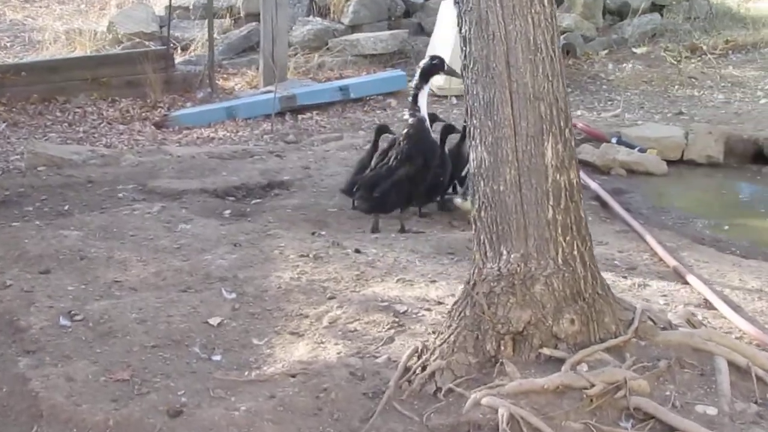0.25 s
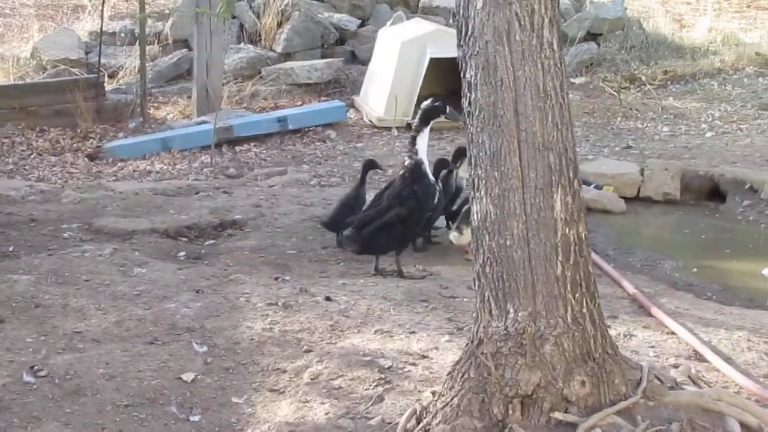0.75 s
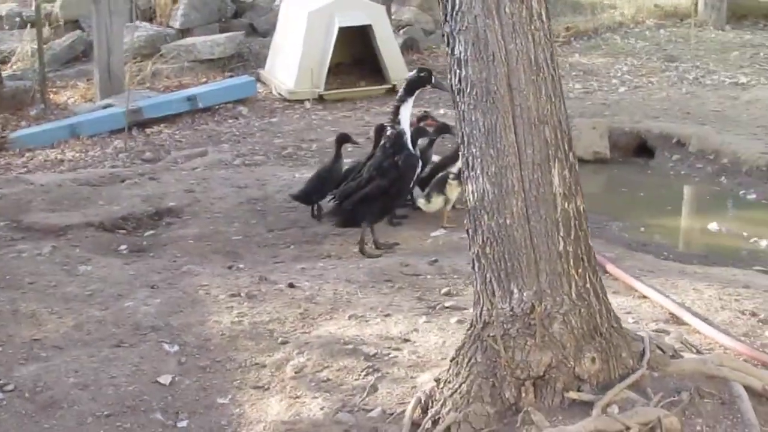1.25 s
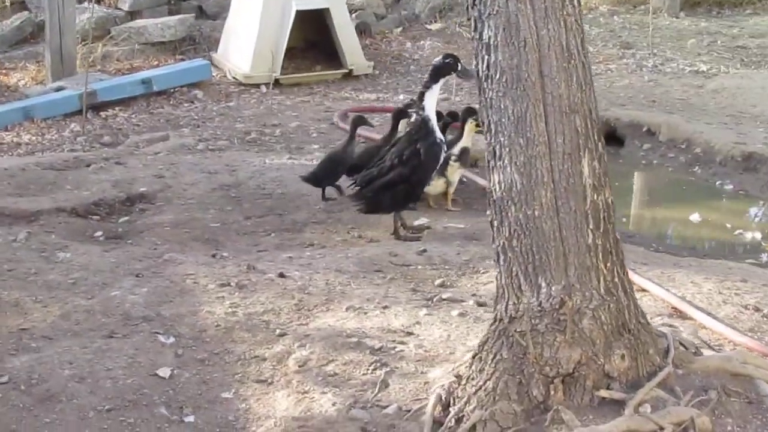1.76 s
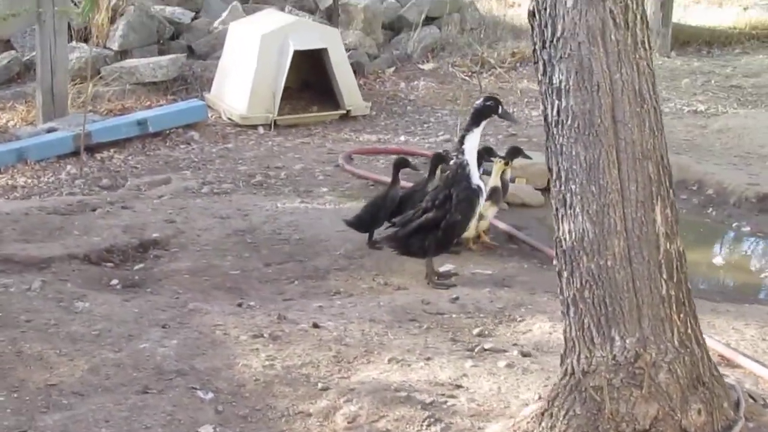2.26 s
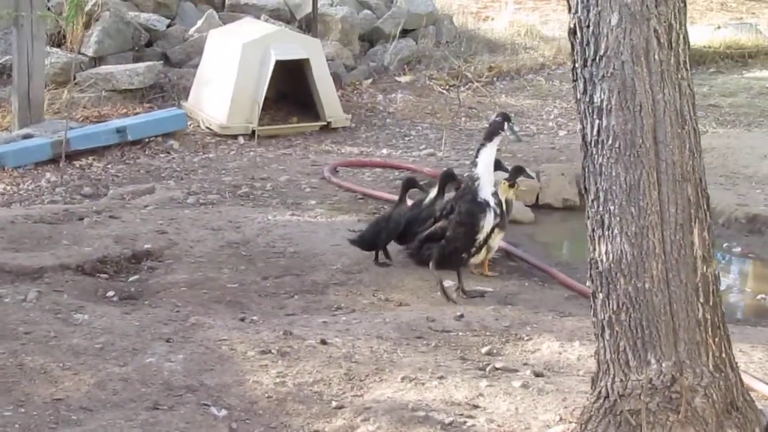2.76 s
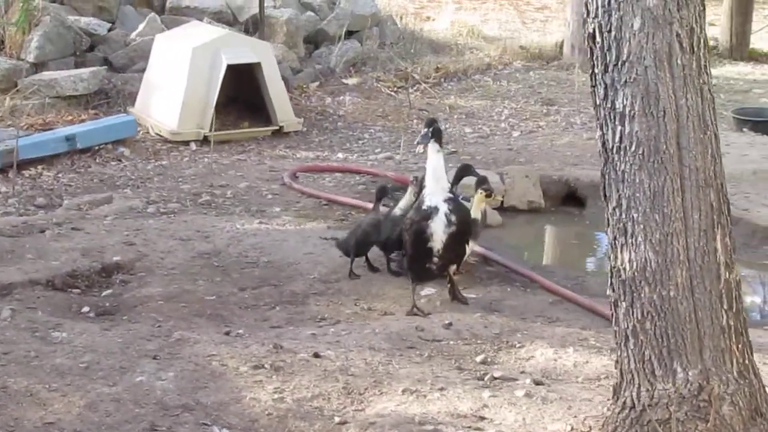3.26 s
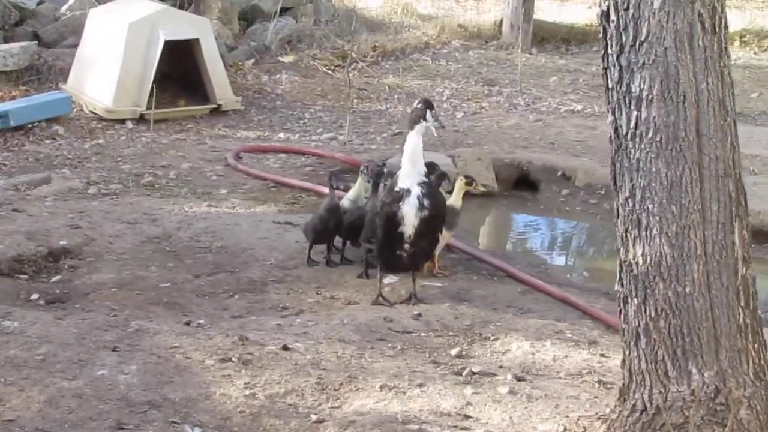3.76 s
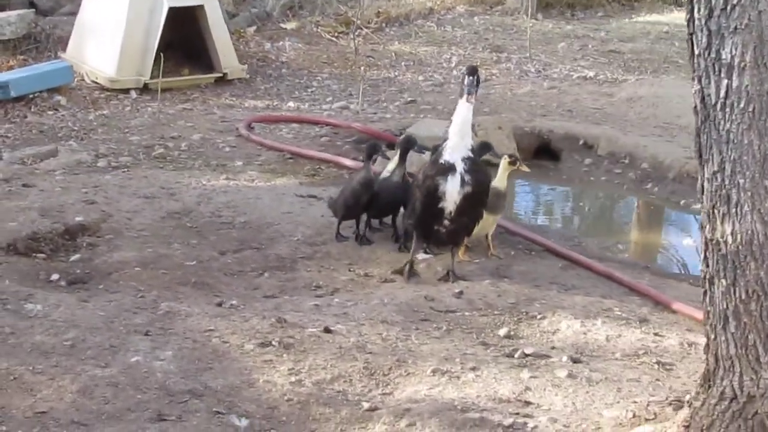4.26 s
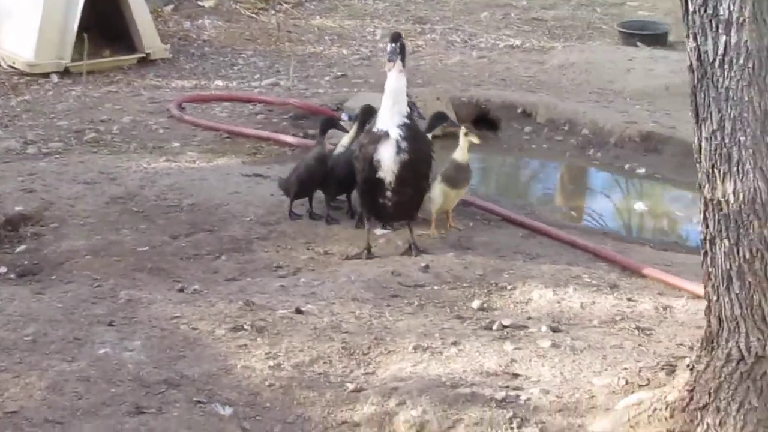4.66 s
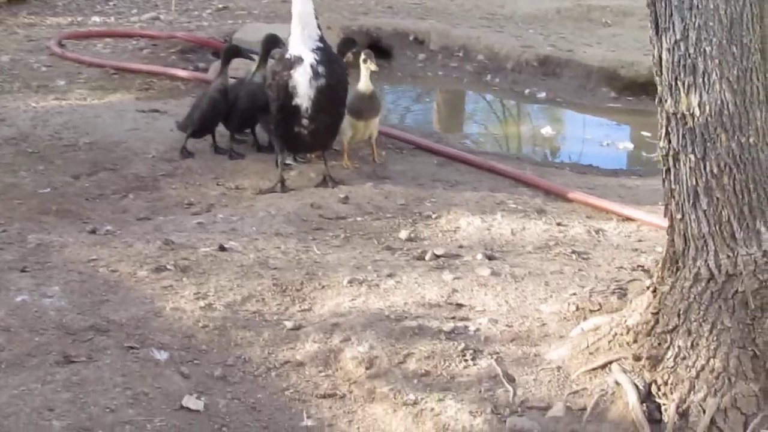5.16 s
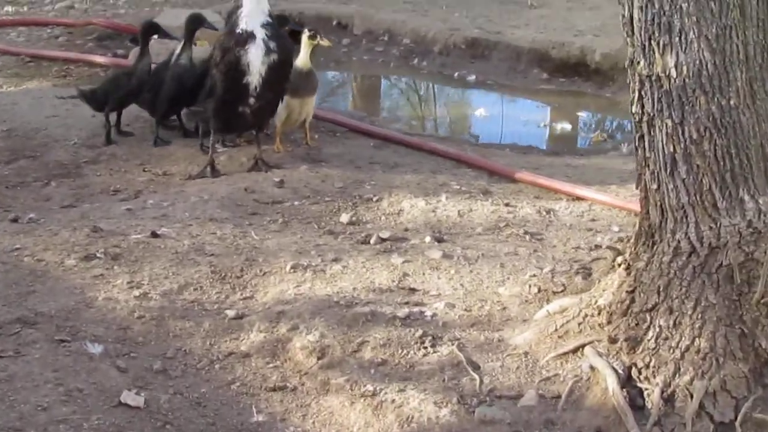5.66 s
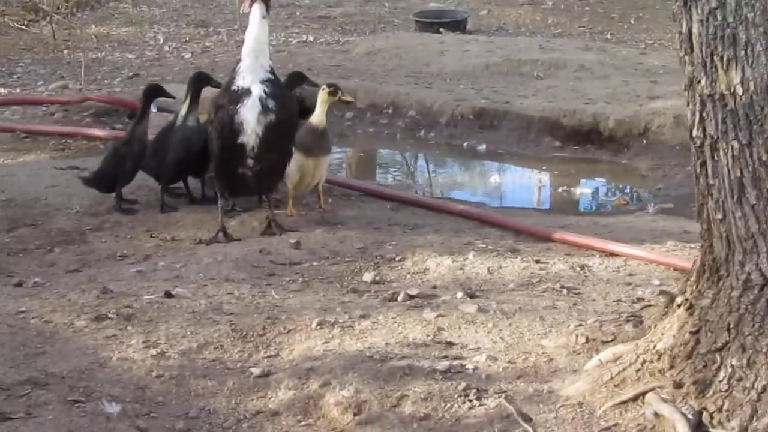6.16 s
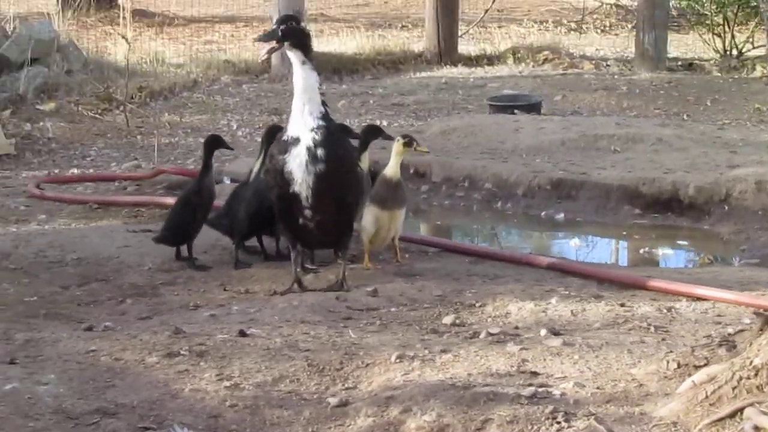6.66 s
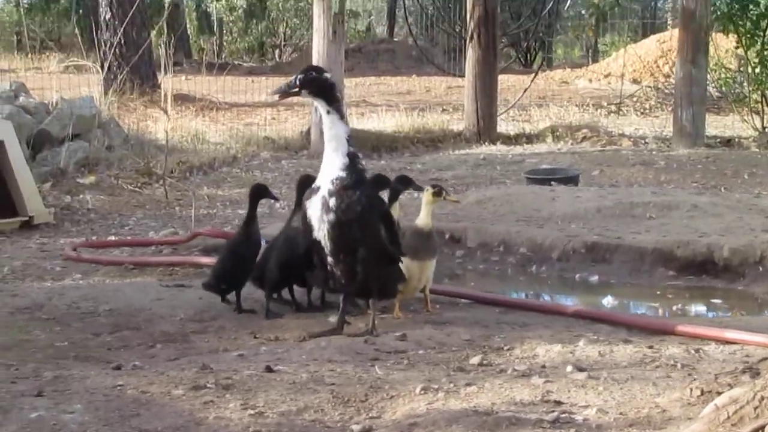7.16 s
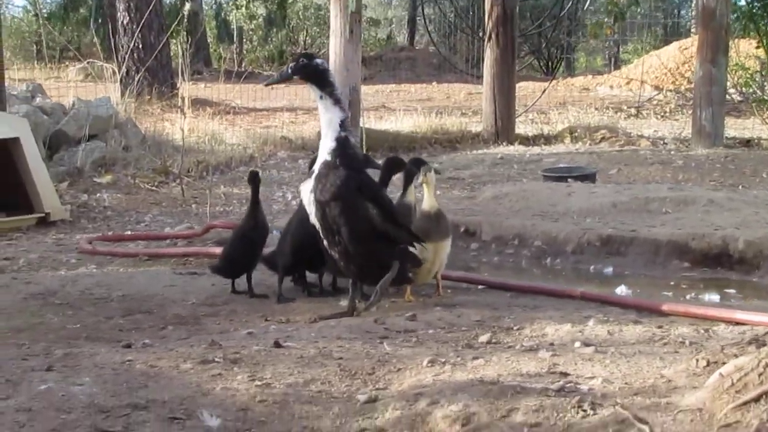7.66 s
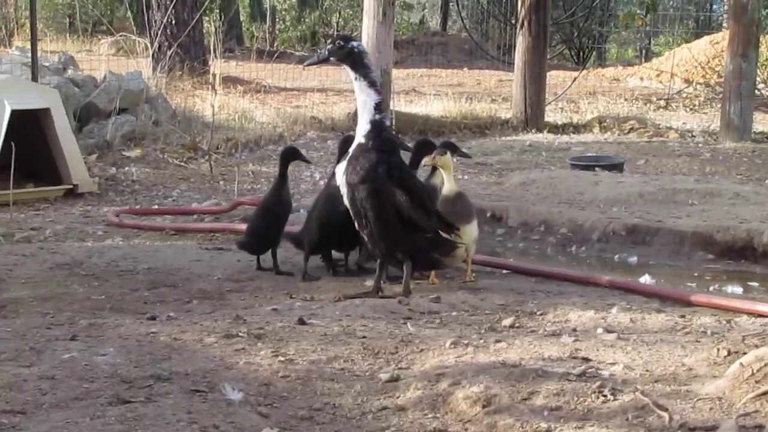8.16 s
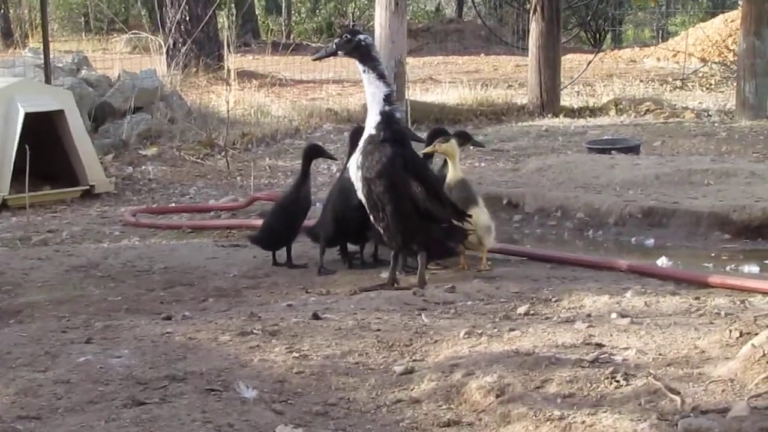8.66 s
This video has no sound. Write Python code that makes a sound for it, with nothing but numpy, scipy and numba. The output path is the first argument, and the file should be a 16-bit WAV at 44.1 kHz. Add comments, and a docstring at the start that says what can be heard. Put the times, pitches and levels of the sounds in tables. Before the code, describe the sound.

A handheld stereo microphone in an open yard picks up a duck family. Dense, piercing chirpy peeps come first over soft throaty clucking, then a rasping quack. The clucks become louder and more frequent through the middle, with two more sharp quacks, gritty footsteps and slight low microphone buffeting. The end is calmer, with sparse drawn-out peeps, quiet muttering, faint low drone and airy hiss.

```python
"""A mother duck leads her ducklings across a farmyard, a few metres away, over rumble and hiss. From the start
other ducks mutter softly, she clucks in rattling pulses, and the ducklings peep, each with two whistles; a
distant engine soon fades, and feet scuff the dry dirt, a swell of tiny clicks. Thin whines slip in, then three
loud quacks through an open bill, near 1.5, 4.4 and 6.6 s. A low drone joins from 4.4 s; the yard answers every
call with a faint echo of filtered, decaying noise."""
import sys
import numpy as np
from scipy import signal
from scipy.fft import rfft, irfft
from scipy.io import wavfile
from scipy.ndimage import uniform_filter1d
from numba import njit

SR = 44100
rng = np.random.default_rng(int(sys.argv[2]) if len(sys.argv) > 2 else 0)


def log_audio(samples):
    """Write samples as a 16-bit WAV file to the path given in sys.argv[1]."""
    # one column per channel
    frames = np.atleast_2d(samples).T
    # limit to full scale, then quantise
    limited = np.clip(frames, -1, 1)
    pcm = np.round(limited * 32767).astype(np.int16)
    wavfile.write(sys.argv[1], SR, pcm)


N = 393372
T = np.arange(N) / SR
TOP_HZ = 15800  # upper edge of the whole sound


def undb(db):
    """Decibels to gain."""
    return 10 ** (np.asarray(db) / 20)


def curves(rows):
    """The columns of a table, joined by straight lines in time."""
    s, *columns = np.transpose(rows)
    return [np.interp(T, s, column) for column in columns]


def ramp(t, start, length):
    """From 0 to 1 over the given stretch of time."""
    return np.clip((t - start) / length, 0, 1)


def unit(x):
    """Scale to rms 1."""
    return x / np.sqrt(np.mean(x ** 2) + 1e-18)


def walk(rate, size):
    """Smooth random drift with a spread near 1, given the rate of its steps per second."""
    step = int(SR / rate)
    levels = np.repeat(rng.standard_normal(size // step + 1), step)
    return 1.335 * uniform_filter1d(levels, step)[:size]


def sine(hz):
    """A sine that follows a moving pitch."""
    return np.sin(2 * np.pi * np.cumsum(hz) / SR)


def colour(x, points, size=1024):
    """Minimum-phase filter with the given (Hz, dB) response, built by folding its cepstrum."""
    hz, db = np.transpose(points)
    grid = np.maximum(np.arange(size // 2 + 1) * SR / size, 1)
    response_db = np.interp(np.log(grid), np.log(hz), db)
    cepstrum = irfft(np.log(undb(response_db)))
    cepstrum[1:size // 2] *= 2
    cepstrum[size // 2 + 1:] = 0
    impulse = irfft(np.exp(rfft(cepstrum)))
    return signal.fftconvolve(x, impulse)[:len(x)]


@njit
def svf(x, hz, width):
    """State-variable band-pass whose centre may move."""
    y, b, l = np.empty(len(x)), 0., 0.
    for i in range(len(x)):
        g, k = np.tan(np.pi * hz[i] / SR), width / hz[i]
        v = (b + g * (x[i] - l)) / (1 + g * (g + k))
        b, l, y[i] = 2 * v - b, l + 2 * g * v, k * v
    return y


def ring(x, hz, width):
    """One resonance, fixed or moving."""
    return svf(x, hz * np.ones(len(x)), float(width))


def band(x, low_hz, high_hz, order=2):
    """Butterworth band-pass."""
    sections = signal.butter(order, [low_hz, high_hz], "band", fs=SR, output="sos")
    return signal.sosfilt(sections, x)


def add(out, start, x):
    """Mix a sound in from a given time, trimmed to the scene."""
    i = int(round(start * SR))
    x = x[max(-i, 0):max(N - i, 0)]
    out[max(i, 0):max(i, 0) + len(x)] += x


def air():
    """Open air: rumble reaches both ears nearly alike; the hiss is mostly unrelated."""
    # (time [s], rumble level [dB], hiss level [dB]), before the lift and background gain
    air_levels = [(0.0, -47, -52.5), (4.97, -50, -55), (8.92, -49.5, -52.5)]
    # spectra of rumble and hiss: (frequency [Hz], gain [dB])
    rumble_colour = [(20, -17), (90, -4.5), (190, -7.5), (350, -15.5), (1200, -18), (2100, -24),
                     (3500, -60.5)]
    hiss_colour = [(700, -5.5), (2400, -4.5), (4000, -6.5), (12300, -15), (16000, -25)]
    lift_db, side_db, shared_hiss = 1, -13, 0.15
    rumble_db, hiss_db = curves(air_levels)
    *low_sides, low_shared = [unit(colour(rng.standard_normal(N), rumble_colour, size=8192)) for _ in range(3)]
    *high_sides, high_shared = [unit(colour(rng.standard_normal(N), hiss_colour)) for _ in range(3)]
    rumble = low_shared + undb(side_db) * np.array(low_sides)
    rumble = rumble * undb(rumble_db + lift_db + 1.5 * walk(7, N))
    hiss = shared_hiss * high_shared + np.array(high_sides)
    return rumble + hiss * undb(hiss_db + lift_db + 0.099 * walk(13, N))


def far_engine():
    """A far engine slows and fades: sine partials locked to its firing rate, each wavering in level."""
    # (time [s], firing rate [Hz], level before the background gain [dB])
    engine_course = [(0, 122.6, -47), (1.1, 117.9, -45), (2.1, 115, -57), (8.9, 116.5, -91)]
    # (multiple of the firing rate [ratio], mean level before scaling to rms 1 [dB])
    partials = [(5 / 8, -14), (1, 0), (9 / 8, -15)]
    hz, db = curves(engine_course)
    turns = np.cumsum(hz * (1 + 0.0047 * walk(5.6, N))) / SR
    engine = 0
    for multiple, part_db in partials:
        engine = engine + undb(part_db + 2 * walk(3.88, N)) * np.sin(2 * np.pi * multiple * turns)
    return unit(engine) * undb(db)


def handling():
    """Air buffets the moving microphone: a deep flutter, different in each ear."""
    floor_db, swell_db, loudest_s, span_s = -63.5, 7, 4.8, 3.2
    swell = undb(floor_db + swell_db * np.exp(-((T - loudest_s) / span_s) ** 2))
    return swell * np.array([unit(band(rng.standard_normal(N), 31, 66)) for _ in range(2)])


def syrinx(cycles, rough, last):
    """A sharp pulse at each whole cycle and a puff of air after it; roughness unsettles both."""
    jitter, scatter_db = 0.1348, 5  # at full roughness: timing in cycles, level per unit spread
    puff_gain, puff_s = 2.0, 0.0038
    n = np.arange(len(cycles))
    pulses, puffs = np.zeros(len(n)), np.zeros(len(n))
    for k, (late, size) in enumerate(rng.standard_normal((last + 1, 2))):
        r = np.interp(k, cycles, rough)
        at = np.interp(k + jitter * r * late, cycles, n)
        near = n[max(int(at) - 8, 0):int(at) + 9]
        gain = undb(scatter_db * r * np.clip(size, -2, 2))
        # a windowed sinc places the pulse between samples
        pulses[near] += gain * np.sinc(near - at) * np.sinc((near - at) / 9)
        puffs[int(at)] += gain
    puffs = signal.lfilter([1], [1, -np.exp(-1 / (puff_s * SR))], puffs)
    breath = puff_gain * unit(puffs * rng.standard_normal(len(n)))
    return unit(pulses), breath


@njit
def echo_loop(x, lag, gain):
    """A delay line of moving length that feeds itself."""
    y = x.copy()
    for i in range(len(x)):
        at = i - lag[i]
        if at > 0:
            k = int(at)
            y[i] += gain * (y[k] + (at - k) * (y[k + 1] - y[k]))
    return y


def windpipe(x):
    """Each pulse bounces up and down the long windpipe, whose length changes as the neck moves."""
    round_trip_s, stretch, reflection, scatter = .0015, 0.04, 0.49, 0.58
    neck = walk(13.75, len(x)) + rng.standard_normal()
    lag = round_trip_s * SR * (1 + stretch * neck)
    pipe = echo_loop(x, lag, -reflection)
    # bill and head scatter the treble, differently for every call
    taps = rng.standard_normal(128) * np.linspace(1, 0, 128) ** 2
    return pipe + scatter * signal.lfilter(taps / np.linalg.norm(taps), 1, pipe)


def cluck(start, end, level_db, dip_db):
    """Slow separate pulses open and close a syllable; between, tighter membranes rattle fast and breathily."""
    # throat and bill resonances with the bill nearly shut: (frequency [Hz], width [Hz], gain [dB])
    shut_throat = [(1056, 170, 1), (1540, 66, 4), (1765, 131, 2.5), (2433, 132, -3), (2880, 324, -12.5)]
    # buzz of the syrinx through the shut bill: (frequency [Hz], gain [dB])
    shut_buzz = [(2000, -79), (3400, -0.5), (4500, 4), (6000, 3.5), (7500, -0.5), (9500, -10.5),
                 (12000, -6.5), (15000, -28)]
    # she turns towards the listener and away; as her bill shuts, the chest hum reaches higher:
    # (time [s], treble re voice at normal loudness [dB], chest re base level [dB], top of the hum [Hz])
    posture = [(0, -22, -14, 950), (2.6, -16.5, -10.5, 905), (3.1, -12.5, -14.5, 696),
               (5.6, -16, -16.5, 750), (7.2, -15.5, -12, 560), (8.6, -16, -4.5, 1260)]
    slack_hz, tight_hz, edge_s = 98, 155, .024
    edge_rough, middle_rough = 0.209, 0.571
    normal_db, brighter_db_per_db = -25.5, 0.64  # a cluck louder than normal is also brighter
    hum_bottom, hum_rough = 0.14, 0.5  # hum's lower edge as a share of its top; its share of the roughness
    tire_db, whine_db = 1.0, -13

    t = np.arange(start - .002, end + .008, 1 / SR)
    along = ramp(t, start, end - start)
    tension = np.clip(np.minimum(t - start, end - t) / edge_s, 0, 1) ** 3
    cycles = np.cumsum(slack_hz + (tight_hz - slack_hz) * tension) / SR
    # stretch the pulse train so that whole cycles fall on both ends
    cycles -= np.interp(start, t, cycles)
    last = max(int(round(np.interp(end, t, cycles))), 1)
    cycles *= last / np.interp(end, t, cycles)
    rough = edge_rough + (middle_rough - edge_rough) * tension
    pulses, puffs = syrinx(cycles, rough, last)
    source = pulses + rough * puffs

    # the level rises in from each end; the pressed middle is changed by the given dip
    inset = min(.011, (end - start) / 2)
    edge_db = np.interp(t, [start, start + inset, end - inset, end], [-4.5, -1.5, -2.5, -4.5])
    db = level_db + tire_db * (.5 - along) + edge_db
    pressed_db = dip_db * ramp(np.minimum(along, 1 - along), 0.2, 0.11)

    s, *columns = np.transpose(posture)
    treble_db, chest_db, hum_hz = (np.interp(start, s, column) for column in columns)
    treble_db += brighter_db_per_db * (level_db - normal_db)
    throat = 0
    for k, (hz, width, gain_db) in enumerate(shut_throat):
        shift = 1 + 0.052 * walk(42.5, len(t))  # tongue and bill keep moving the resonances
        throat = throat + (-1) ** k * undb(gain_db) * ring(source, hz * shift, width)
    buzz = unit(colour(windpipe(source), shut_buzz))
    voice = undb(-pressed_db) * (unit(band(throat, 490, 3620)) + undb(treble_db) * buzz)

    # the chest hums most in the middle, where a wavering whine also dips and rises
    swell = np.sin(np.pi * along) ** .5
    steady_pulses, _ = syrinx(cycles, hum_rough * rough, last)
    chest = unit(band(steady_pulses, hum_bottom * hum_hz, hum_hz)) * undb(chest_db)
    whine = sine((2300 - 1200 * swell) * (1 + 0.086 * walk(700, len(t))))
    return t[0], voice * undb(db) + swell * undb(level_db) * (chest + undb(whine_db) * whine)


def muttering():
    """Runs of soft clucks of uneven length and strength."""
    # (start [s], end [s], mean base level [dB])
    mutters = [(0, .45, -39), (0.699, .93, -37.5), (2.242, 2.72, -37.5), (3.046, 3.5, -39.5),
               (5.079, 5.16, -36.5), (7.089, 7.3, -36.5), (8.397, 8.9, -41)]
    syllable_s, pause_s, spread, scatter_db = .055, 0.022, .3, 0.5
    out = np.zeros(N)
    for start, end, db in mutters:
        for length, gap, size in rng.uniform(-1, 1, (12, 3)):
            stop = start + syllable_s * (1 + spread * length)
            if (start + stop) / 2 > end:
                break
            add(out, *cluck(start, stop, db + scatter_db * size, 0))
            start = stop + pause_s * (1 + spread * gap)
    return out


def peep(crest, length, crest_hz, db):
    """A whistle arches and falls; the other side of the syrinx sings a weaker one that bends away from it."""
    drawn_out = length > .05
    rise_s = 0.026 * (1 + .25 * rng.uniform(-1, 1))  # each peep takes its own time to rise
    drop_s = 0.0191
    t = np.arange(-rise_s, length + drop_s, 1 / SR)
    rising = np.clip(-t / rise_s, 0, 1)  # from 1 at the start to 0 at the crest
    dropping = ramp(t, length, drop_s)
    if drawn_out:
        # it settles on a low note, a share of the crest, and holds it
        fall, low_hz = .037, .868 * crest_hz
        falling = np.clip(t / fall, 0, 1)
        sag = np.sin(falling * np.pi / 2) ** 1.54
    else:
        # it falls ever faster for nearly all of its length, at a mean 16500 Hz per second
        fall = length - 0.00414
        low_hz = crest_hz - 16500 * fall
        falling = np.clip(t / fall, 0, 1)
        sag = falling ** 1.4
    rise_depth = 0.41 * (1 + 0.207 * rng.uniform(-1.03, 1))
    hz = crest_hz + (low_hz - crest_hz) * sag
    hz = hz * (1 - rise_depth * rising ** 2) * (1 - .24 * dropping ** 1.4)

    if drawn_out:
        other_hz = low_hz * (1.14 + 0.14 * np.clip((t - fall - .006) / .03, -1.5, 1.5) ** 2)
        shape_db = -7 * rising - 12 * (1 - falling) ** 3 - 20 * dropping
        other_db, overtone_db = -8 - 10 * (1 - falling), -17
    else:
        bend = 0.23 * rng.choice([-1, 1])  # above or below the first whistle
        other_hz = hz * (1 + bend * (0.142 + rising + falling ** 2))
        shape_db = -20 * rising ** 2.7 - 4 * falling ** 3 - 20 * dropping
        other_db, overtone_db = -10, -27
    one, other = (sine(pitch * (1 + 0.011 * walk(300, len(t)))) for pitch in (hz, other_hz))
    tone = one + undb(other_db) * other
    # the membranes saturate, which adds a cluster of partials three times as high
    tone += undb(overtone_db) * band(4 * tone ** 3, 5300, 10000) / 2
    fade = np.clip(np.minimum(t - t[0], t[-1] - t) / 0.00069, 0, 1)
    return crest - rise_s, np.sqrt(2) * tone * fade * undb(db + shape_db + 0.77 * walk(106.0, len(t)))


def ducklings():
    """All the peeps, each a pair of whistles."""
    # (time of the crest [s], length from the crest to the closing drop [s], crest pitch [Hz], base level [dB])
    peeps = [(0.026, 0.031, 3080, -27.5), (.112, 0.062, 2680, -41), (.345, 0.021, 2980, -48),
             (.39, 0.04, 2920, -28), (.45, 0.026, 3010, -33), (0.544, 0.032, 3140, -28),
             (.614, 0.031, 3110, -35.5), (0.7, 0.025, 3143, -26), (.722, 0.067, 2640, -38),
             (1.081, 0.035, 2910, -46), (1.15, 0.032, 3060, -35.5), (1.209, 0.048, 3050, -28.5),
             (1.327, .022, 3050, -34.5), (1.372, 0.033, 3100, -28), (1.537, .029, 2980, -30),
             (1.996, 0.061, 2900, -32.5), (2.224, 0.049, 3086, -28), (2.294, 0.045, 2860, -31.5),
             (2.729, 0.023, 2600, -41), (2.908, .03, 2750, -39.5), (3.265, 0.018, 2814, -32.5),
             (4.148, 0.057, 2747, -30), (4.732, 0.048, 2824, -34.5), (5.627, 0.055, 2740, -29.5),
             (6.325, .08, 2710, -47), (6.811, 0.064, 2630, -51.5), (7.234, 0.062, 2887, -29.5),
             (7.507, 0.07, 2868, -27), (8, 0.067, 2825, -32.5), (8.236, 0.078, 2970, -33)]
    out = np.zeros(N)
    for row in peeps:
        add(out, *peep(*row))
    return out


def scuffs():
    """Grit crunches under a foot: a swell of tiny clicks."""
    # feet on dry dirt: (time of the peak [s], time to either side where it is 17 dB down [s], peak level [dB])
    steps = [(0.422, 0.1, -47), (3.592, 0.093, -43.5), (4.359, 0.13, -40.5), (5.288, .005, -38),
             (5.574, 1, -43.5), (5.835, 0.026, -35)]
    out = np.zeros((2, N))
    swell = sum(undb(db) * np.exp(-2 * ((T - s) / length) ** 2) for s, length, db in steps)
    for side in out:
        sparse = rng.random(N) < .1
        grain_db = 4.0 * np.minimum(rng.exponential(size=N), 5)
        grains = rng.standard_normal(N) * sparse * undb(grain_db)
        side += swell * unit(band(grains, 1300, 10800, order=1))
    return out


def whine_arch(crest, crest_hz, db):
    """A thin wavering tone glides up to its crest and down again."""
    half_s, arch, waver = 0.05, 0.92, 0.032  # time either side; share of pitch lost over it; pitch spread
    u = np.arange(-half_s, half_s, 1 / SR) / half_s
    hz = crest_hz * (1 - arch * u ** 2) * (1 + waver * walk(500, len(u)))
    return crest - half_s, undb(db) * sine(hz) * (1 - u ** 4)


def quack(start, clear, end, attack_s, top_hz, level_db, rasp, treble_db,
          rasp_f1_hz, clear_f1_hz, f2_hz, gullet_db):
    """The bill opens wide: a rasp climbs and clears into a buzzing tone through two moving formants."""
    # buzz of the syrinx through the open bill: (frequency [Hz], gain [dB])
    open_buzz = [(2000, -85), (3400, 1.5), (4000, 2), (5200, 1.5), (6600, -1), (7900, 3.5), (9800, -7.5),
                 (11200, -7), (15000, -26)]
    climb_per_s, arch, arch_crest = 2.0, .16, .47  # shares of the top pitch; crest as share of the clear tone
    clearing_s, clear_rough, clear_db = 0.032, 0.067, -1  # the clear tone is a little softer than the rasp
    onset_db, release_s, release_db, release_sag = -14.5, 0.029, -19, 0.0458  # sag: share of the pitch
    shut_f1_hz, f2_follow = 1050, 0.33  # first formant as the bill parts; power of pitch the second follows
    brighter_db_per_db = 0.55  # the buzz swells faster than the voice
    chest_db, fade_s = -18, 0.0052

    t = np.arange(start - .002, end + 2 * fade_s, 1 / SR)
    cleared = ramp(t, clear - clearing_s, clearing_s)
    release = ramp(t, end - release_s, release_s)
    climb = climb_per_s * np.maximum(clear - t, 0)
    bow = arch * (ramp(t, clear, end - clear) - arch_crest) ** 2
    effort = 1 - climb - bow - release_sag * release
    rough = clear_rough + (rasp - clear_rough) * (1 - cleared + release)  # the rasp returns on release
    attack = ramp(t, start, attack_s) ** 0.91
    db = level_db + onset_db * (1 - attack) + clear_db * cleared + release_db * release

    cycles = np.cumsum(top_hz * effort) / SR - .15
    pulses, puffs = syrinx(cycles, np.clip(rough, 0, 1), int(cycles[-1]))
    source = pulses + rough * puffs
    f1 = np.interp(t, [start, clear - clearing_s, clear], [shut_f1_hz, rasp_f1_hz, clear_f1_hz])
    f2 = f2_hz * effort ** f2_follow
    throat = ring(source, f1, 210) - undb(2.0) * ring(source, f2, 190)
    throat += undb(-13) * ring(source, 2700, 600)
    throat -= undb(gullet_db) * ring(source, 720, 47)  # the gullet adds a low shoulder

    treble_db = treble_db + brighter_db_per_db * (db - level_db)
    buzz = unit(colour(windpipe(source + 0.04 * puffs), open_buzz))
    voice = unit(band(throat, 460, 4350)) + undb(treble_db) * buzz
    voice += undb(chest_db) * unit(band(pulses, 118, 317))
    return t[0], voice * undb(db) * np.clip((t[-1] - t) / (2 * fade_s), 0, 1)


def mother():
    """All her full clucks, whines and quacks, each from its own row."""
    # (first pulse [s], last pulse [s], base level [dB], dip in the pressed middle, negative for a rise [dB])
    clucks = [(0.073, .16, -30.5, 1), (0.26, 0.272, -33, -13.5), (0.345, 0.421, -29, 6.5),
              (0.78, 0.869, -24.5, 4), (.987, 0.995, -27, 1), (1.068, 1.134, -29.5, 7),
              (2.369, 2.429, -30, 1.5), (2.64, 2.697, -34.5, 23), (3.022, 3.046, -28.5, 0.5),
              (3.091, 3.172, -23.5, 0.5), (3.217, 3.304, -28, 10.5), (3.353, 3.429, -23, 5.5),
              (3.677, 3.704, -28.5, 0), (3.747, 3.828, -20, 4), (3.886, 3.961, -25.5, 14),
              (4.065, 4.093, -23.5, 3.5), (4.113, 4.119, -26, 7), (4.342, 4.364, -27.5, -0.5),
              (4.903, 4.928, -26.5, -0.5), (4.936, 5.046, -19, 4), (5.152, 5.178, -26, -4),
              (5.362, 5.458, -23, 10.5), (5.515, 5.591, -22, 17), (5.706, 5.765, -19, 11),
              (5.96, 6.056, -21, 10.5), (6.11, 6.194, -19, 11.5), (6.261, 6.327, -16.5, 8.5),
              (7.137, 7.18, -22.5, 1.5), (7.186, 7.259, -24, 4.5), (8.485, 8.535, -27, 17),
              (8.551, 8.621, -28, 9), (8.789, 8.886, -22, 20)]
    # thin whines between syllables: (time of the crest [s], crest pitch [Hz], peak level [dB])
    whines = [(0.949, 1954, -38), (1.084, 1850, -41), (3.912, 2030, -41)]
    # (start [s], rasp clears [s], end [s], attack [s], top pitch [Hz], base level [dB],
    #  rasp roughness [0-1], treble re voice at base level [dB], first formant in the rasp [Hz],
    #  first formant in the clear tone [Hz], second formant at top pitch [Hz], gullet resonance [dB])
    quacks = [(1.473, 1.635, 1.8, 0.17, 193, -16.5, 0.37, -16, 1370, 1170, 1880, -8.5),
              (4.395, 4.546, 4.645, 0.036, 197.4, -17.5, 0.39, -9, 1340, 1160, 2020, -12),
              (6.567, 6.656, 6.778, 0.031, 180.7, -18, 0.33, -11.5, 1270, 1370, 1780, -29)]
    out = np.zeros(N)
    for call, rows in ((cluck, clucks), (whine_arch, whines), (quack, quacks)):
        for row in rows:
            add(out, *call(*row))
    return out


def low_drone():
    """A low sine rises out of silence and holds, wavering in pitch and level."""
    # (time [s], level before the background gain [dB])
    drone_level = [(4.4, -93), (5.3, -54.5)]
    drone = sine(96.6 * (1 + 0.011 * walk(15.0, N))) * undb(4.2 * walk(10, N))
    return unit(drone) * undb(curves(drone_level)[0])


def yard(x, near_db, near_t60, far_db):
    """Stony ground scatters treble at once; the tree trunk follows, fences and stones answer later and duller."""
    # left minus right for the birds: (frequency [Hz], difference [dB])
    balance = [(200, -1.5), (700, -1.5), (1300, -1), (2400, -6), (4400, 1.5), (8000, -1)]
    # (level [dB], time to decay by 60 dB [s], lower edge [Hz], upper edge [Hz])
    echoes = ((-11, .014, 2800, TOP_HZ), (near_db, near_t60, 900, TOP_HZ), (far_db, .45, 250, 3200))
    t = np.arange(SR // 2) / SR
    out = []
    for sign in (1, -1):
        echo = 0
        for db, t60, low_hz, high_hz in echoes:
            tail = band(rng.standard_normal(len(t)) * undb(-60 * t / t60), low_hz, high_hz, order=1)
            echo = echo + undb(db) * tail / np.linalg.norm(tail)
        direct = colour(x, [(hz, sign * db / 2) for hz, db in balance])
        out.append(direct + signal.fftconvolve(direct, echo)[:N])
    return np.array(out)


def scene():
    """The birds in the yard and the scuffing feet, over a background that dips briefly around the last quack."""
    # (time [s], background gain [dB])
    background_gain = [(6.6, 5.5), (6.85, -4), (7.35, 3)]
    background = air() + far_engine() + handling() + low_drone()
    birds = yard(mother() + muttering(), near_db=-9.5, near_t60=0.24, far_db=-24.5)
    birds = birds + yard(ducklings(), near_db=-7, near_t60=0.18, far_db=-22)
    return birds + scuffs() + background * undb(curves(background_gain)[0])


def record(dry):
    """The recorder cuts the top: a steep elliptic low-pass."""
    return signal.sosfilt(signal.ellip(8, .2, 70, TOP_HZ, fs=SR, output="sos"), dry)


dry = scene()
out = record(dry)
log_audio(out)
```